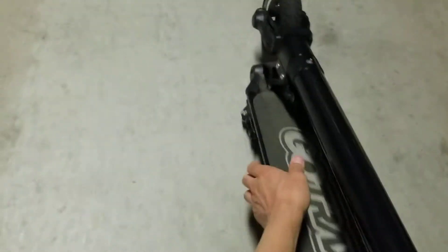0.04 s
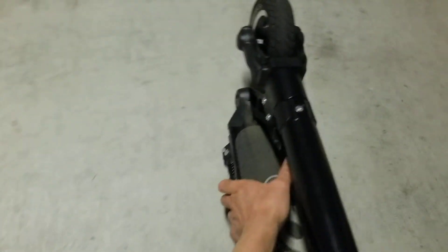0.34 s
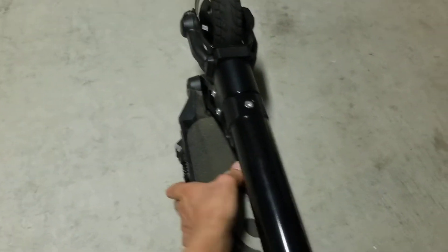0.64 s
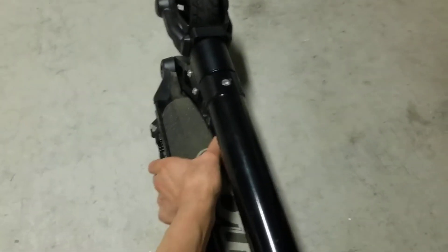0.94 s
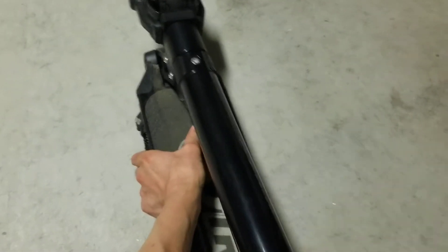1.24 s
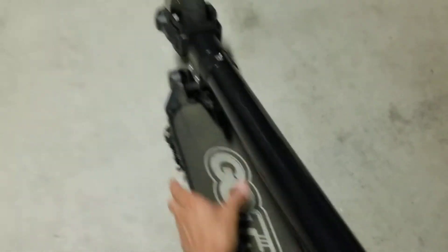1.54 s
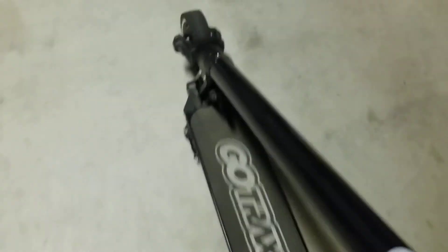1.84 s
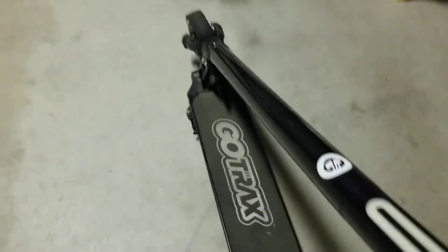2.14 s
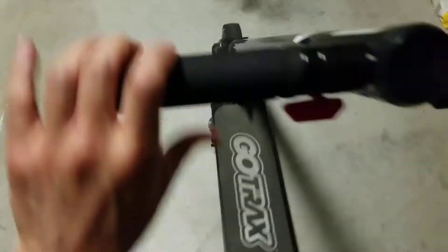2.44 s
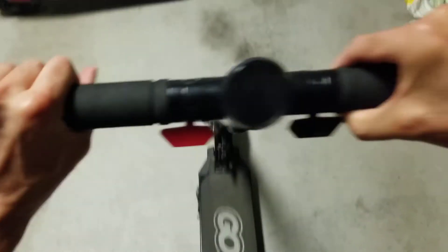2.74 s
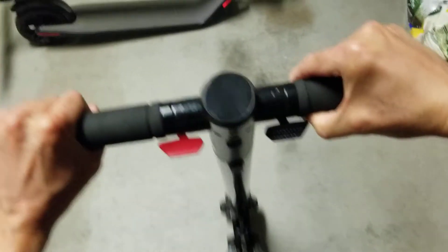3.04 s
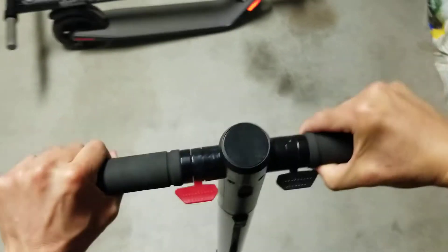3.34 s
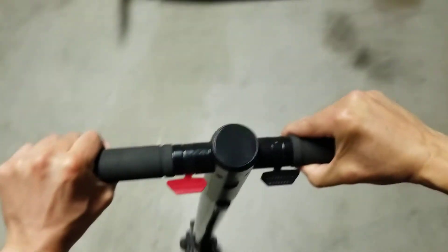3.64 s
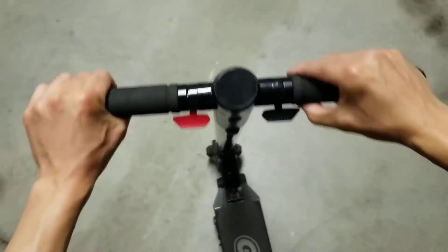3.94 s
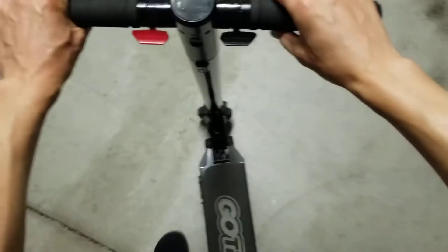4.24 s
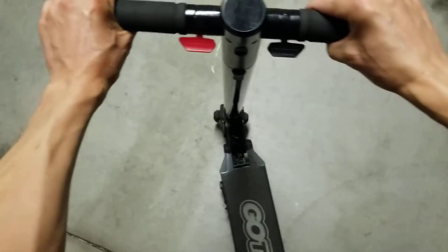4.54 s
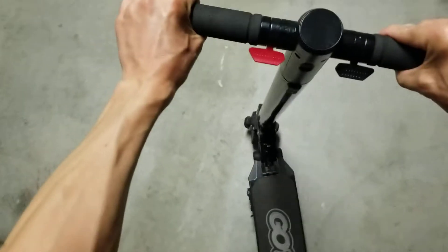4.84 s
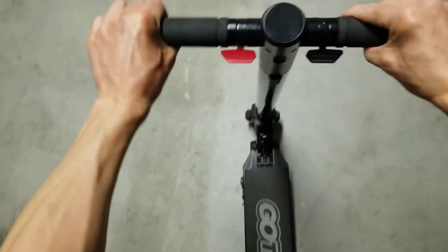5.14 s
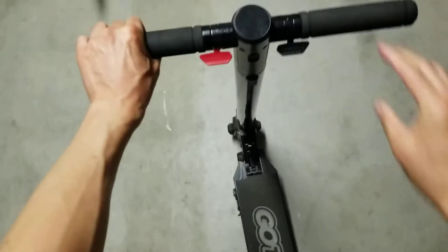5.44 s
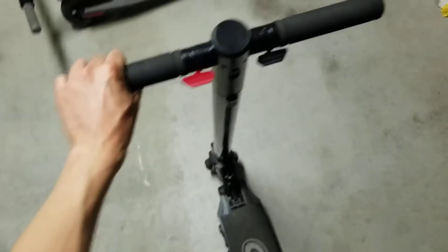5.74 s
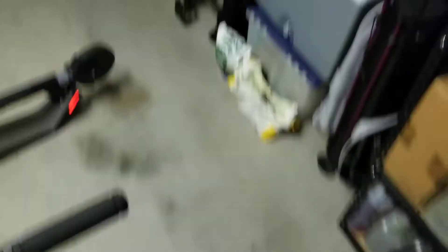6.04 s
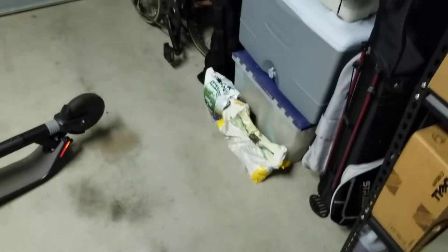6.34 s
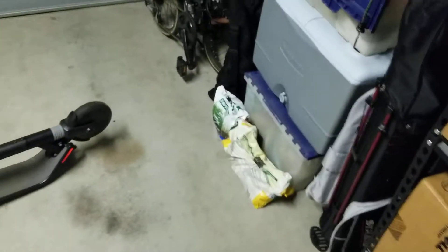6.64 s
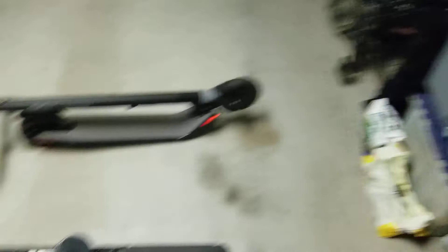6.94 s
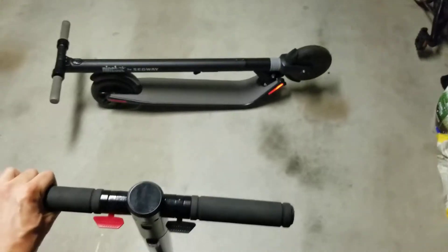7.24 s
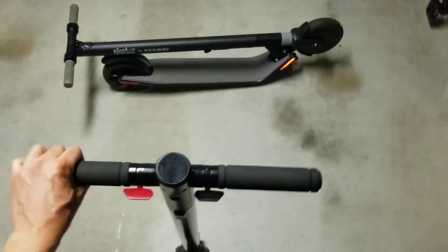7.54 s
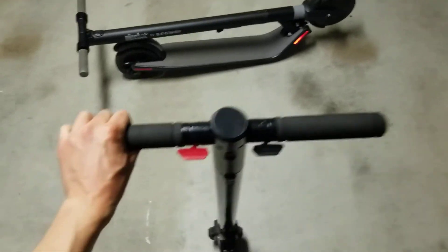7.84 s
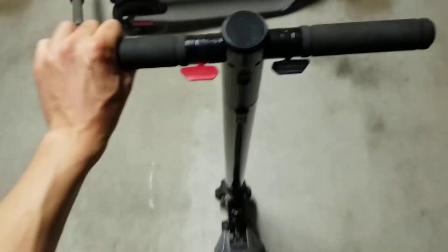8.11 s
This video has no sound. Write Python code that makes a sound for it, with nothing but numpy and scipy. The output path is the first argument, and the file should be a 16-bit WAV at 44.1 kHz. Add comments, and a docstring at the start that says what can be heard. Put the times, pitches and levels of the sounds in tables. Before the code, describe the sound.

A scooter is handled close to the microphone in a still garage with a short echo. It opens with a rattling knock, soft clothing swishes and a couple of lighter knocks at 0.5 seconds. The steel folding lock clicks sharply at 1.0 and 1.4 seconds. Tyres roll softly on concrete and hands slide, with small knocks and cable ticks. At 3.0 seconds a swish and quick clatter lead into the loudest sound, the latch snapping shut with a brief metallic ring at 3.2. The hollow frame clunks, with low floor bumps, around 3.7 to 3.9. Clothes swish, then the front tyre chirps at 4.55 and gives a wavering squeal from 4.8 to 5.1, ending in more knocks. Rolling and rubbing fade by about 6 seconds. Only faint ticks, bumps and swishes remain, with a clearer swish near 8 seconds.

```python
"""Scooter unfolded in a garage.

Close up, the steel folding lock clicks twice, then latches. The hollow frame knocks and rings,
tyres roll on concrete, hands slide, cables tick, feet and wheels bump the floor. The front tyre
sticks and slips in a chirp and a squeal as the bar turns. Clothes and shoes swish in between,
over still air and a short room tail."""
import sys
import numpy as np
from scipy import signal
from scipy.fft import rfft, irfft, next_fast_len
from scipy.io import wavfile
from scipy.ndimage import uniform_filter1d

SR = 44100
rng = np.random.default_rng(int(sys.argv[2]) if len(sys.argv) > 2 else 0)


def persist_wave(psi):
    """Save psi, clipped to +-1, as 16-bit WAV."""
    counts = np.round(np.clip(psi, -1, 1) * 32767).astype(np.int16)
    wavfile.write(sys.argv[1], SR, np.atleast_2d(counts).T)


N = 369161

# diffuse sound, likeness of the two channels: freq_hz, coherence
COHERENCE = [(40, .7), (130, .99), (280, .96), (550, .85), (1100, .45), (2200, .35), (4500, .3),
             (16000, .1)]
# garage reverberation: freq_hz, t60_s
GARAGE_DECAY = [(100, 0.2), (400, 0.32), (1000, 0.32), (3000, 0.44), (6500, 0.43), (11000, .29),
                (16000, 0.11)]
# still air: freq_hz, gain_db
AIR_SPECTRUM = [(25, -12.5), (65, 4), (125, -6), (220, -11.5), (350, -16), (680, -26), (790, -12),
                (900, -29), (1750, -22), (2150, -12), (2750, -26.5), (6000, -28), (9300, -35), (12200, -22)]
# blows on stem, deck and wheels: start_s, level_db, hardness_db, chatter_s, resonance_hz
FRAME_KNOCKS = [(0.001, -36.5, -10, 0.065, 1590), (0.044, -43, -9.5, 0.021, 2300),
                (0.5, -48.5, -14, 0.0065, 1300), (0.519, -44, -18, 0.0062, 900),
                (0.61, -66.5, 4, 0.0011, 1050), (1.127, -60, -2, 0.0087, 289),
                (1.777, -52, -16, 0.012, 1011), (2.329, -46, -17, 0.0023, 1425),
                (2.444, -41.5, -30, 0.00047, 906), (2.907, -47, -19, 0.0015, 1570),
                (3.042, -32, -2, 0.0085, 1080), (3.085, -32, -15, 0.0066, 1300),
                (3.125, -37, -6, 0.038, 1025), (3.663, -44, -11, 0.064, 670), (3.725, -34, -9, 0.0098, 701),
                (3.8456, -28.5, -13, 0.0051, 684), (3.8507, -26.5, -4, 0.0043, 621),
                (3.885, -41, 0.5, 0.072, 674), (4.082, -46.5, -5.5, .02, 1514),
                (5.046, -49, -28, 0.014, 483), (5.085, -44, -9, 0.042, 1072),
                (5.1334, -32.5, -3, 0.012, 791), (5.158, -34.5, -18, 0.0021, 652),
                (5.538, -51.5, 1.5, 0.001, 807), (5.62, -61, -14, .003, 1735),
                (6.72, -71.5, 8, 0.0037, 333), (7.019, -62, -23, 0.042, 287),
                (7.61, -57.5, 5.5, 0.0041, 1515), (7.943, -54, 6, 0.035, 683)]
# thud, body and edge of a knock: low_hz, high_hz
BANDS = [(80, 450), (450, 2000), (2500, 16000)]
# frame response: freq_hz, gain_db
FRAME_SPECTRUM = [(25, -33.5), (60, -12), (130, -5), (220, -2.5), (300, -2.5), (420, -6), (650, -2.5),
                  (1100, -4.5), (1600, -6.5), (2400, -8), (4200, -17.5), (9500, -28), (12000, -24),
                  (16000, -28)]
# ring of the frame tubes: freq_hz, level_db, t60_s
TUBE_MODES = [(194, -1, .3), (274, -2, .3), (308, -5, .35), (555, -2, .25), (652, -1, .42), (740, -4, .42),
              (815, -4, .35), (955, -6, .25), (1112, -2, .35), (1371, -5, .35), (1540, -6, .35),
              (2310, -5, .3), (2536, -4, .25), (3456, -3, .35)]
# strokes of clothes and shoes: start_s, level_db, swell_s, tilt_db_per_octave
CLOTH_STROKES = [(0.01, -51, 0.074, 0.5), (0.313, -47.5, 0.07, -3.5), (0.67, -65, 0.064, 5.5),
                 (1.85, -55, 0.041, -1), (2.878, -43, 0.028, 2), (3.033, -31, 0.023, 0),
                 (4.02, -45.5, 0.015, 0.5), (4.28, -43.5, 0.091, -1.5), (4.62, -48.5, 0.028, 0),
                 (4.688, -41.5, 0.084, 2.5), (5.755, -62, 0.054, 0), (5.939, -53.5, 0.071, 0),
                 (6.72, -61.5, 0.031, 1.5), (7.35, -55.5, 0.06, 3.5), (7.532, -48, 0.048, 2),
                 (7.832, -53.5, 0.034, 0.5), (7.947, -40, 0.019, -1)]
# cloth hiss: freq_hz, gain_db
CLOTH_SPECTRUM = [(150, -38), (500, -12.5), (1000, -2.5), (2000, 5), (4000, 7), (7000, 3.5), (9500, 0.5),
                  (12500, 2), (16000, -8.5)]
# strokes of tyres and hands: fastest_s, length_s, roll_db, slide_db
RUB_STROKES = [(0.133, 0.076, -51, -60.5), (1.398, 0.085, -53, -62), (1.794, 0.23, -61, -58),
               (2.06, 0.075, -59, -56.5), (2.328, .26, -51.5, -52.5), (2.825, 0.32, -61.5, -62.5),
               (3.083, 0.33, -53, -53), (3.7, 0.33, -59.5, -58.5), (4.047, 0.25, -63.5, -54.5),
               (4.6, 0.15, -60.5, -69), (4.783, 0.036, -48, -61), (4.9, 0.11, -77, -48.5),
               (5.19, 0.56, -56, -52), (5.478, 0.082, -54, -54.5), (6.996, 0.22, -69.5, -66),
               (7.7, 0.62, -75.5, -68.5)]
# tyres on grit, hands on the stem: freq_hz, gain_db
ROLL_SPECTRUM = [(25, -18.5), (70, -3.5), (180, -7.5), (350, 1.5), (600, -2.5), (800, -2.5), (1400, -4.5),
                 (2200, -10), (4000, -18.5), (9000, -45)]
SLIDE_SPECTRUM = [(600, -26.5), (2000, -4), (3300, 1), (5000, 0), (7000, -4), (9500, -9), (11200, -6),
                  (12600, 1), (14000, -9), (16000, -10)]
# cables and levers touching, or cloth letting go abruptly: start_s, level_db
HARD_TICKS = [(0.505, -63.5), (1.939, -59.5), (2.634, -52.5), (5.555, -64), (6.292, -61.5)]
# one tick: freq_hz, gain_db
TICK_SPECTRUM = [(500, -21), (1500, -6), (3000, 2.5), (4500, -8.5), (7000, -7), (9500, -3), (12000, 7),
                 (16000, -26)]
# feet and wheels on the floor: start_s, level_db, pitch_hz
FLOOR_BUMPS = [(0.527, -50, 116), (0.602, -56, 94.5), (1.455, -53.5, 64), (1.916, -51, 92),
               (2.443, -51, 77), (2.515, -50, 51), (2.99, -47, 70), (3.035, -39, 50), (3.089, -43.5, 59),
               (3.727, -36, 72.5), (3.849, -37, 74), (4.114, -53, 57), (4.776, -43.5, 81),
               (4.932, -44.5, 89), (5.138, -47, 68), (6.218, -54, 94), (7.03, -52, 138)]
# snaps of lever, catch and latch: start_s, level_db, chatter_s, wet_db
LOCK_SNAPS = [(1.0315, -33, 0.0058, -0.5), (1.379, -28, .002, -3), (3.1743, -18, .02, 1.5)]
# lever, catch letting go, latch closing: freq_hz, gain_db
LEVER_SPECTRUM = [(90, -50), (480, -27), (600, -14), (905, -7), (1040, -13), (1320, -1), (1790, -19),
                  (2600, -2), (3250, 2), (3840, -14), (7470, -15), (10000, -23), (12100, -9), (16000, -24)]
CATCH_SPECTRUM = [(88, -34), (150, -31), (201, -19), (514, -4.5), (578, 6.5), (649, -4), (1600, 3),
                  (1720, 1), (2310, 8.5), (3160, 3.5), (3700, -2.5), (7920, -6.5), (8900, -18),
                  (11900, -5.5), (16000, -19)]
LATCH_SPECTRUM = [(88, -62), (150, -38), (414, -25.5), (774, -3), (871, -13.5), (1240, -7.5), (1360, -16.5),
                  (1720, -9), (1900, -10), (2220, -5), (3040, -6), (3350, 1.5), (8900, -14), (11700, -7),
                  (16000, -19)]
# ring of the steel lock: freq_hz, level_db, t60_s
LOCK_MODES = [(738, -8, .55), (1335, -5, .38), (2525, -6, .3), (3225, -1, .38), (3331, 0, .45),
              (3459, 0, .42), (3914, 0, .33), (4047, -2, .3), (4096, -2, .3), (4543, -4, .32),
              (6569, -3, .3), (11740, -3, .24)]
# tread grabbing, then slipping evenly: time_s, pitch_hz, fundamental_db, octave_db
TYRE_CHIRP = [(4.53, 464, -81, -75.5), (4.564, 496, -47.5, -57), (4.572, 523.3, -56, -60.5),
              (4.61, 533, -59, -114)]
TYRE_SQUEAL = [(4.78, 719.7, -49, -73), (4.798, 689.7, -56, -62), (4.812, 622, -53, -83),
               (4.834, 549.7, -46.5, -53), (4.982, 584, -52.5, -61.5), (5.044, 516, -41.5, -49.5),
               (5.078, 522.5, -45, -60), (5.098, 514.1, -64, -46), (5.13, 553, -49, -40.5)]
# microphone port imbalance: freq_hz, left_minus_right_db
PORT_BALANCE = [(45, 1.5), (110, 3), (600, -2.5), (2000, 2), (4000, -0.15), (8000, 0), (13000, -4.5)]

LEFT_LAG_SAMPLES = 7


def amp(db):
    """Decibels to gain."""
    return 10 ** (np.asarray(db) / 20)


def unit_rms(x):
    """Scales to an rms of one."""
    return x / np.sqrt(np.mean(x ** 2) + 1e-20)


def attack_rms(x):
    """Rms of the first 25 ms."""
    return np.sqrt(np.mean(x[:, :round(.025 * SR)] ** 2)) + 1e-12


def lookup(table, hz):
    """Interpolates on a log-frequency axis."""
    freq_hz, value = np.transpose(table)
    return np.interp(np.log(hz + 1), np.log(freq_hz + 1), value)


def add(mix, start_s, sound):
    """Mixes in a stereo sound."""
    part = mix[:, max(0, round(start_s * SR)):][:, :sound.shape[1]]
    part += sound[:, :part.shape[1]]


def colour(x, spectrum, size=2048):
    """Minimum-phase filter: attacks stay sharp."""
    log_gain = np.log(amp(lookup(spectrum, abs(np.fft.fftfreq(size, 1 / SR)))))
    taps = np.fft.ifft(np.exp(np.conj(signal.hilbert(log_gain)))).real[:size // 2]
    return signal.fftconvolve(x, taps[None], axes=1)[:, :x.shape[1]]


def diffuse(count):
    """Stereo noise: alike in the bass, loosely related in the treble, later on the left."""
    size = next_fast_len(count)
    mid, side = rfft(rng.standard_normal((2, size)))
    coherence = np.clip(lookup(COHERENCE, np.linspace(0, SR / 2, len(mid))), -1, 1)
    mid *= np.sqrt((1 + coherence) / 2)
    side *= np.sqrt((1 - coherence) / 2)
    left, right = irfft(np.array([mid + side, mid - side]), size)[:, :count]
    return np.array([np.roll(left, LEFT_LAG_SAMPLES), right])


def garage_tail(count):
    """Unit-energy reverberation: diffuse noise, each band dying at its own rate."""
    hz, t, bins = signal.stft(diffuse(count), SR, nperseg=256)
    decay = amp(-60 * t / lookup(GARAGE_DECAY, hz)[:, None])
    tail = signal.istft(bins * decay, SR, nperseg=256)[1][:, :count]
    return tail / np.linalg.norm(tail[0])


def strike(chatter_s, spike, wet_db, modes=(), ring_db=-20, count=28000):
    """One hard touch, then loose parts chatter out while modes and room build up."""
    t = np.arange(count) / SR
    fade = np.exp(-t / chatter_s)
    burst = diffuse(count) * fade
    burst /= np.linalg.norm(burst[0])
    burst[[0, 1], [LEFT_LAG_SAMPLES, 0]] += spike / (1 + chatter_s / .005)  # long chatter blunts it
    tail = amp(wet_db) * garage_tail(count)
    if len(modes):
        arrival_s = t - np.array([[LEFT_LAG_SAMPLES], [0]]) / SR
        ring = sum(amp(db - 60 * t / t60_s) * np.sin(2 * np.pi * (hz * arrival_s + rng.random()))
                   for hz, db, t60_s in modes)
        tail += amp(ring_db) * ring / np.linalg.norm(ring[0])
    return burst + tail * (1 - fade)


def friction(grain_db):
    """Surfaces catch and slip: noise whose level jumps every few milliseconds."""
    catches = unit_rms(uniform_filter1d(rng.standard_normal(N), 180))
    return unit_rms(diffuse(N) * amp(grain_db * catches))


def linger(power, keep):
    """One-pole smoothing; keep is the share held per sample."""
    return signal.lfilter([1 - keep], [1, -keep], power)


def air(level_db=-68.5):
    """Still garage air: steady low noise."""
    return amp(level_db) * unit_rms(colour(diffuse(N), AIR_SPECTRUM, size=8192))


def knocks(deck_hz=700, resonance_db=9, log_width=.13, rebound_s=.027, rebound_db=-15):
    """Blows on the hollow frame: large parts thud, small ones ring; each rebounds once, duller."""
    out = np.zeros((2, N))
    grid_hz = np.geomspace(25, 16000, 300)
    bands = [signal.butter(3, band, 'band', fs=SR, output='sos') for band in BANDS]
    for start_s, level_db, hardness_db, chatter_s, hz in FRAME_KNOCKS:
        octaves = np.log2(hz / deck_hz)  # higher for smaller parts
        modes = [*TUBE_MODES, (hz, -5 + 8 * octaves, .36)]
        blow = strike(chatter_s, spike=.47, wet_db=4.5, modes=modes, ring_db=-11)
        peak_db = resonance_db / (1 + (np.log(grid_hz / hz) / log_width) ** 2)
        blow = colour(blow, np.c_[grid_hz, lookup(FRAME_SPECTRUM, grid_hz) + peak_db])
        target_db = level_db + np.array([-5 - 3.5 * octaves, 0, hardness_db])
        band_db = 20 * np.log10([attack_rms(signal.sosfilt(band, blow)) for band in bands])
        thud_db, body_db, edge_db = target_db - band_db
        bass_db = thud_db - 6 * max(octaves, 0)
        balance = [(140, bass_db), (300, thud_db), (600, body_db), (1900, body_db), (3300, edge_db)]
        blow = colour(blow, balance)
        add(out, start_s, blow)
        add(out, start_s + rebound_s, amp(rebound_db) * colour(blow, [(1000, 0), (4000, -9)]))
    return out


def swishes(onset_db=-11, room_t60_s=.33):
    """Cloth and soles let go abruptly, swell and stop; the room holds their energy briefly."""
    out, t = np.zeros((2, N)), np.arange(N) / SR
    fibres = friction(grain_db=.35)
    for start_s, level_db, swell_s, tilt_db_per_octave in CLOTH_STROKES:
        active = (t > start_s) & (t < start_s + .55)
        past_peak_s = t[active] - start_s - swell_s
        stop_s = .015 + .067 * swell_s
        rise = amp(2 * onset_db * (past_peak_s / swell_s) ** 2)
        fall = np.exp(-(past_peak_s / stop_s) ** 2)
        power = np.where(past_peak_s < 0, rise, fall)
        power += linger(power, keep=amp(-120 / (room_t60_s * SR)))
        spectrum = [(hz, db + tilt_db_per_octave * np.log2(hz / 4000)) for hz, db in CLOTH_SPECTRUM]
        hiss = unit_rms(colour(fibres[:, active], spectrum))
        out[:, active] += amp(level_db) * hiss * np.sqrt(power / power.max())
    return out


def rubbing(linger_s=.029):
    """Tyres roll over grit, hands slide on stem and grips; strokes speed up, slow and linger."""
    t, power = np.arange(N) / SR, np.zeros((2, N))
    for fastest_s, length_s, roll_db, slide_db in RUB_STROKES:
        active = abs(t - fastest_s) < 2 * length_s
        stroke = np.exp(-(2 * (t[active] - fastest_s) / length_s) ** 2)
        power[:, active] += amp([[roll_db], [slide_db]]) ** 2 * stroke
    held = linger(power, keep=np.exp(-1 / (linger_s * SR)))
    roll_gain, slide_gain = np.sqrt((power + held) / 2)
    roll = unit_rms(colour(friction(grain_db=1.5), ROLL_SPECTRUM))
    slide = unit_rms(colour(friction(grain_db=1.6), SLIDE_SPECTRUM))
    return roll_gain * roll + slide_gain * slide


def ticks():
    """Cables and levers touch, or cloth lets go: tiny, hard impacts."""
    out = np.zeros((2, N))
    for start_s, level_db in HARD_TICKS:
        tick = colour(strike(chatter_s=.0013, spike=.91, wet_db=0), TICK_SPECTRUM)
        add(out, start_s, amp(level_db) * tick / attack_rms(tick))
    return out


def bumps(skew_rad=.35, skew_hz=68):
    """Feet and wheels push on the floor: a few low cycles plus rumble."""
    out, t = np.zeros((2, N)), np.arange(SR // 3) / SR
    swell = t / .024 * np.exp(1 - t / .018)
    for start_s, level_db, hz in FLOOR_BUMPS:
        rumble = unit_rms(colour(diffuse(len(t)), [(25, -16), (hz, 0), (170, -8), (500, -50)]))
        # deep pushes shake the two ports out of step
        offset_rad = np.array([[1], [-1]]) * skew_rad * (skew_hz / hz) ** 2
        push = np.sin(2 * np.pi * hz * t + offset_rad)
        add(out, start_s, amp(level_db) * swell * (push + .44 * rumble))
    return out


def lock(ring_db=-10, echoes_db=-1):
    """Sprung steel snaps home and rings; floor and deck return a flurry of early echoes."""
    out = np.zeros((2, N))
    spectra = LEVER_SPECTRUM, CATCH_SPECTRUM, LATCH_SPECTRUM
    for (start_s, level_db, chatter_s, wet_db), spectrum in zip(LOCK_SNAPS, spectra):
        crack = strike(chatter_s, spike=1.2, wet_db=wet_db, modes=LOCK_MODES, ring_db=ring_db + wet_db)
        echoes = amp(echoes_db) * strike(chatter_s=.007, spike=0, wet_db=-17.5)
        snap = colour(crack + echoes, spectrum)
        add(out, start_s, amp(level_db) * snap / attack_rms(snap))
    return out


def tyre(curve, waver_share, gain_db=-1.5, fade_s=.0055, wet_db=-8):
    """Tread sticks and slips on concrete: a wavering tone and its octave, with room tail."""
    t = np.arange(N) / SR
    time_s, *columns = np.transpose(curve)
    pitch_hz, fundamental_db, octave_db = (np.interp(t, time_s, column) for column in columns)
    waver = unit_rms(uniform_filter1d(rng.standard_normal(N), 300))
    phase = 2 * np.pi * np.cumsum(pitch_hz * (1 + waver_share * waver)) / SR
    tone = amp(fundamental_db) * np.sin(phase) + amp(octave_db) * np.sin(2 * phase)
    gate = np.clip(np.minimum(t - time_s[0], time_s[-1] - t) / fade_s + 1, 0, 1)
    squeal = np.sqrt(2) * amp(gain_db) * tone * gate
    room = amp(wet_db) * garage_tail(24000)
    room[[0, 1], [LEFT_LAG_SAMPLES, 0]] += 1  # direct path
    return signal.oaconvolve(squeal[None], room, axes=1)[:, :N]


def scene():
    """Scooter handling over still air."""
    handling = air() + knocks() + swishes() + rubbing() + ticks() + bumps() + lock()
    return handling + tyre(TYRE_CHIRP, waver_share=.067) + tyre(TYRE_SQUEAL, waver_share=.0163)


def record(dry):
    """Two unequal microphone ports, soft overload, band limit."""
    ceiling, cutoff_hz = .8, 16200
    left = colour(dry[:1], [(hz, db / 2) for hz, db in PORT_BALANCE])
    right = colour(dry[1:], [(hz, -db / 2) for hz, db in PORT_BALANCE])
    clipped = ceiling * np.tanh(np.vstack([left, right]) / ceiling)
    lowpass = signal.firwin(401, cutoff_hz, window=("kaiser", 9), fs=SR)
    return signal.oaconvolve(clipped, lowpass[None], "same")


dry = scene()
out = record(dry)
persist_wave(out)
```